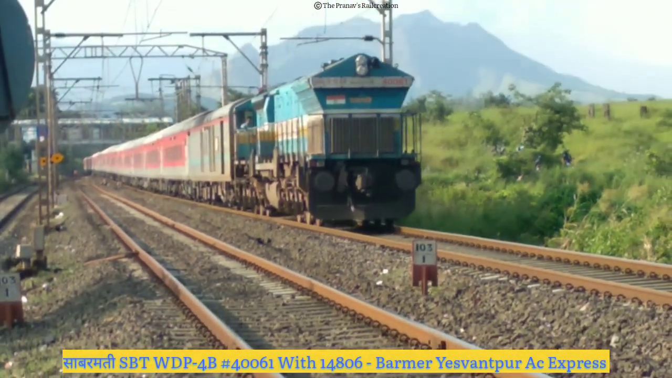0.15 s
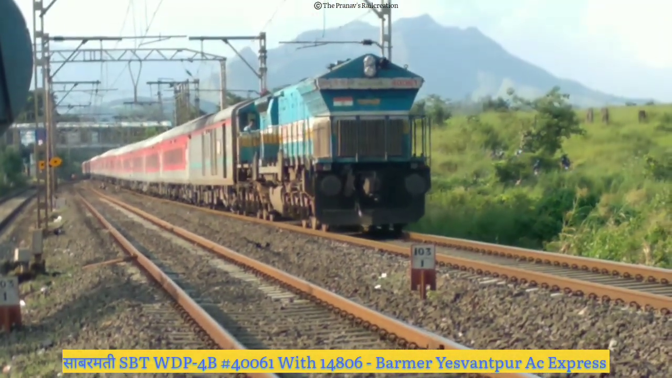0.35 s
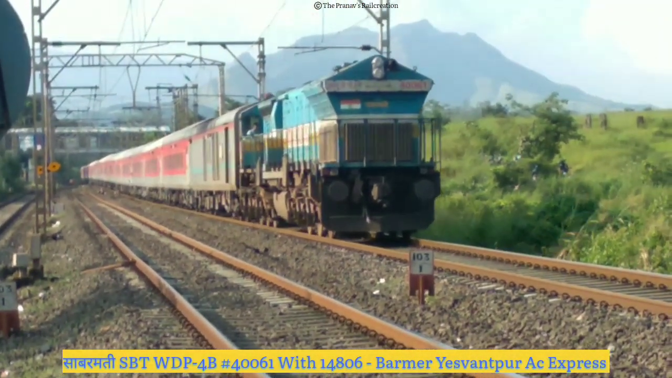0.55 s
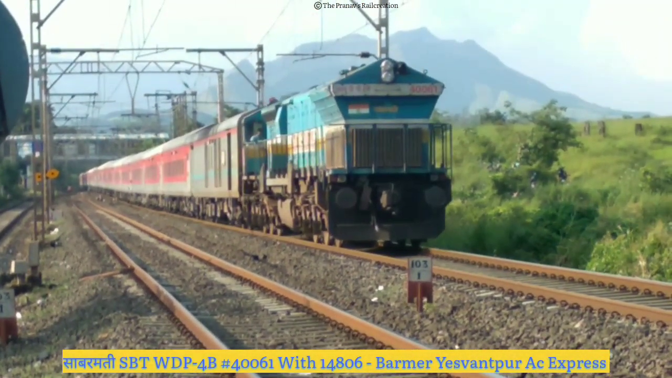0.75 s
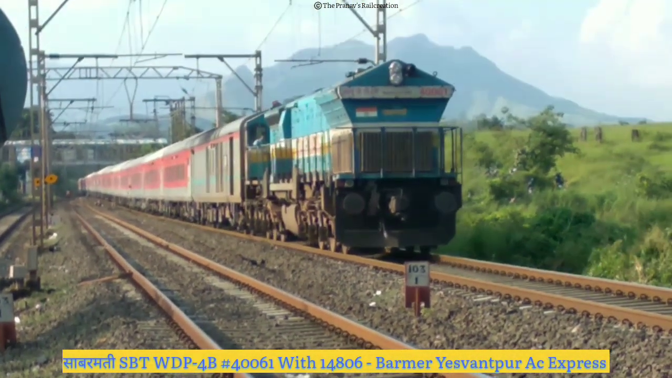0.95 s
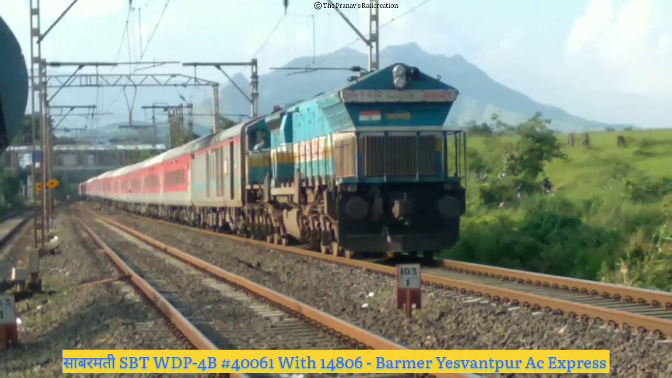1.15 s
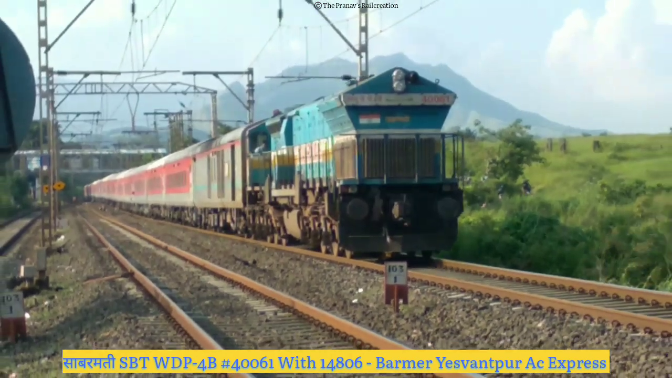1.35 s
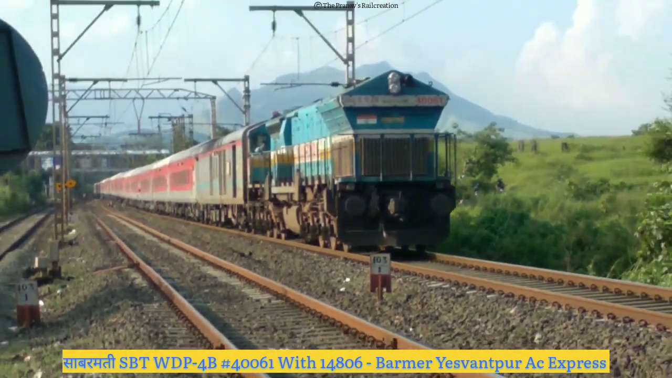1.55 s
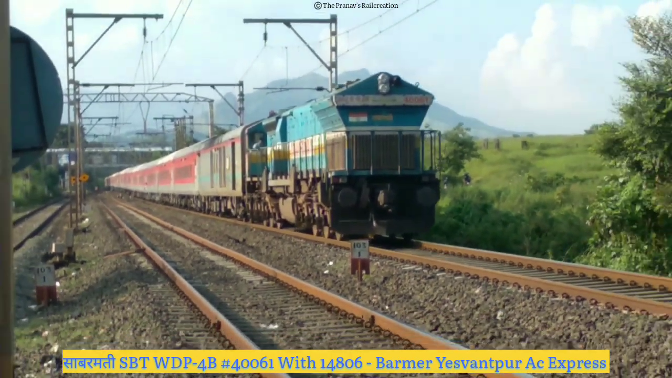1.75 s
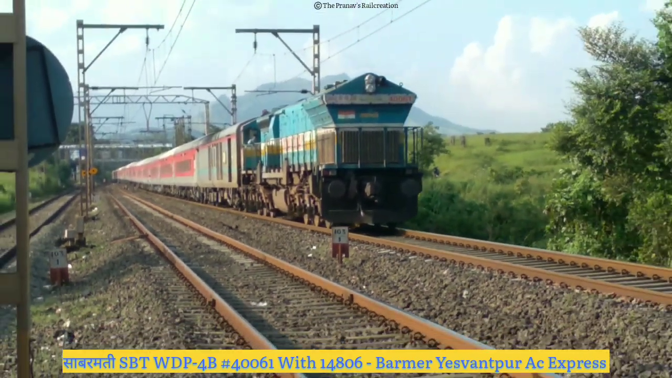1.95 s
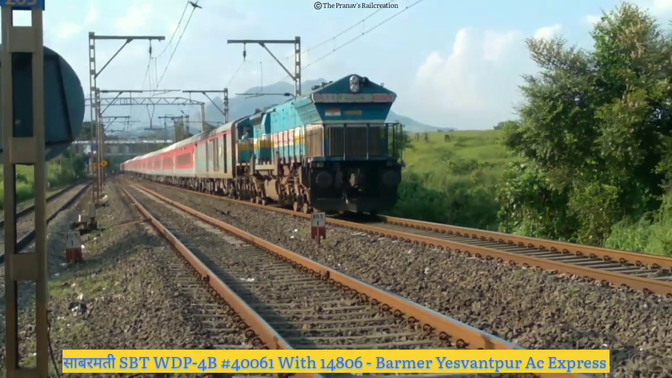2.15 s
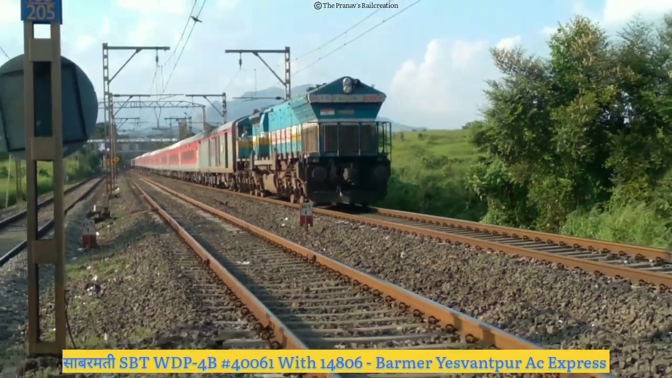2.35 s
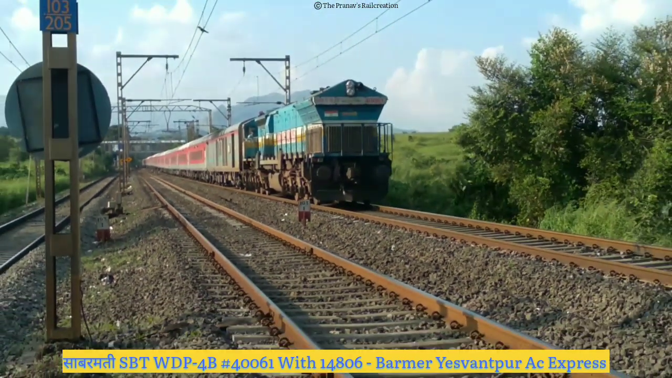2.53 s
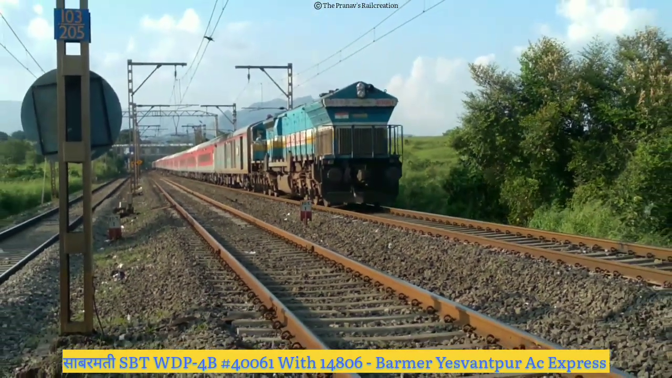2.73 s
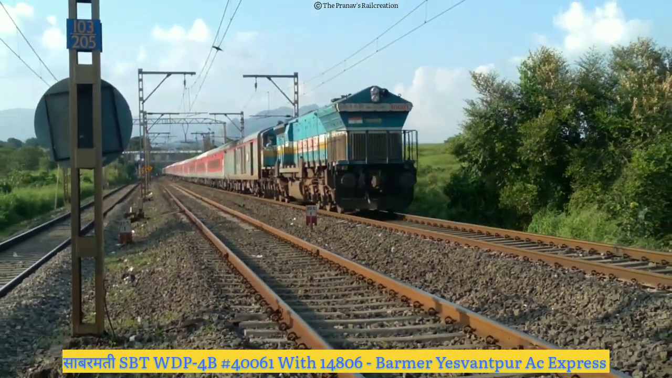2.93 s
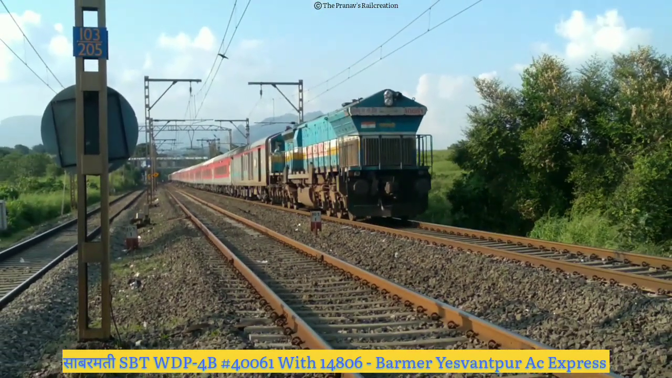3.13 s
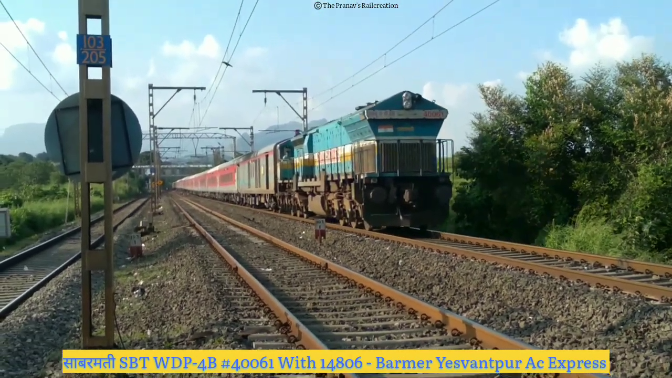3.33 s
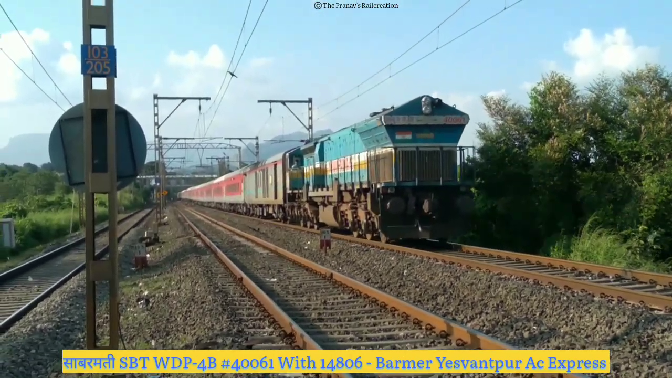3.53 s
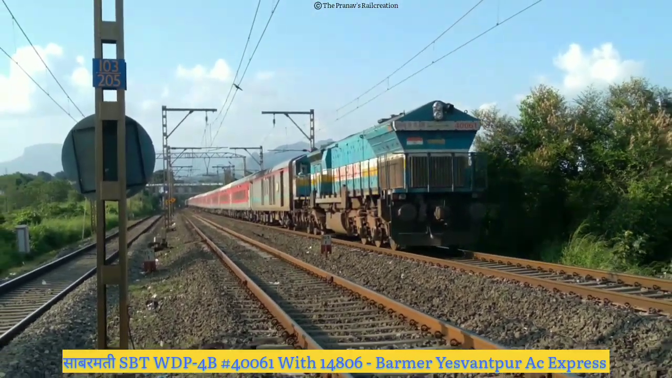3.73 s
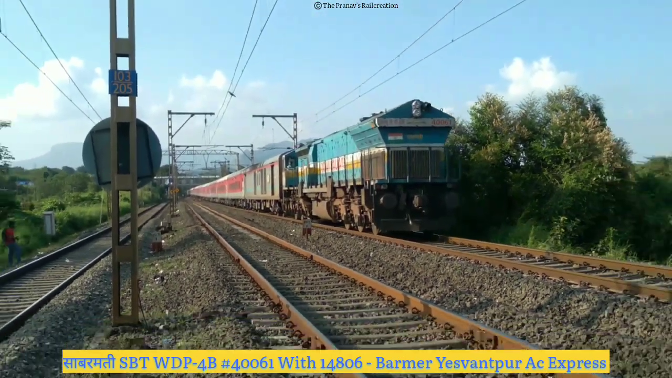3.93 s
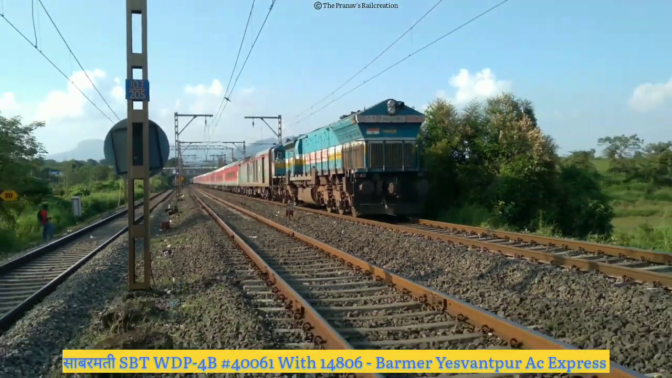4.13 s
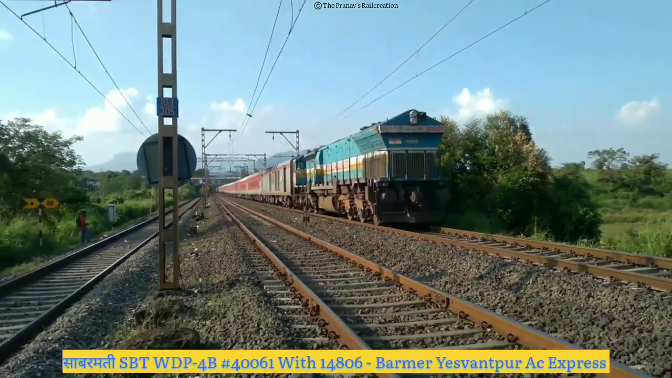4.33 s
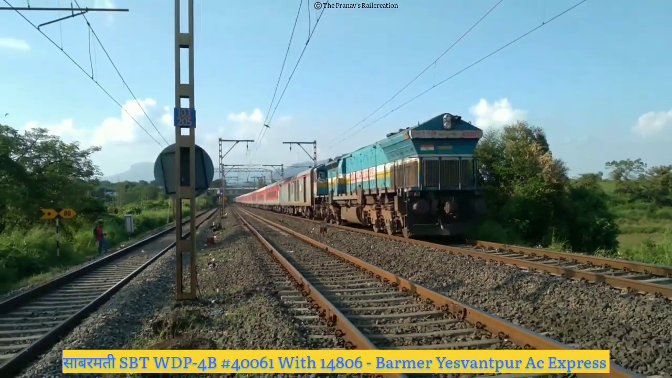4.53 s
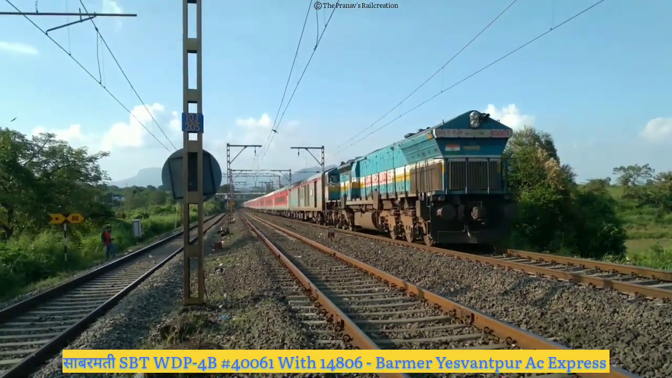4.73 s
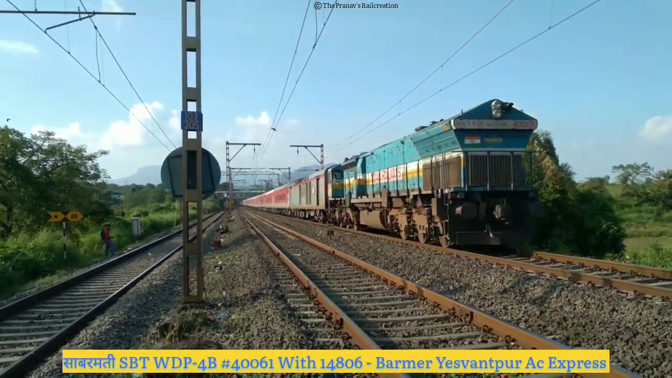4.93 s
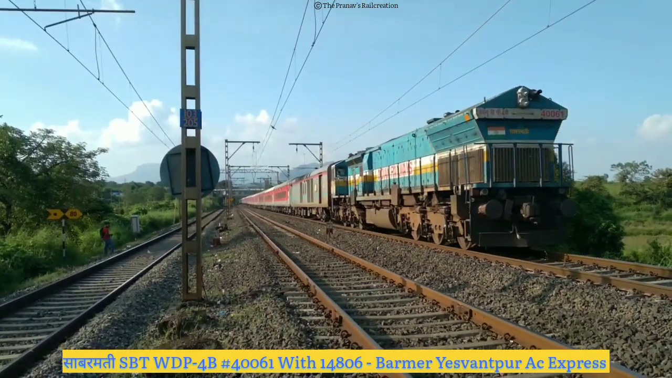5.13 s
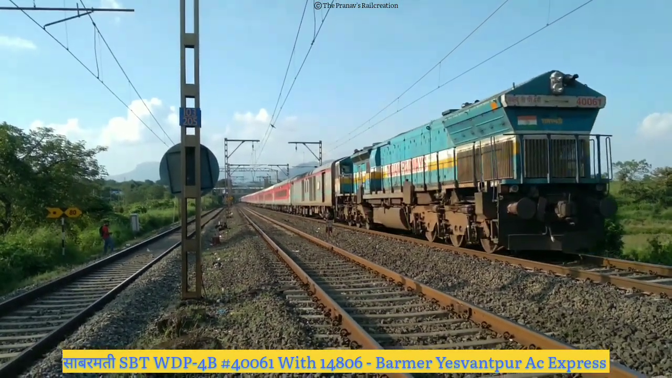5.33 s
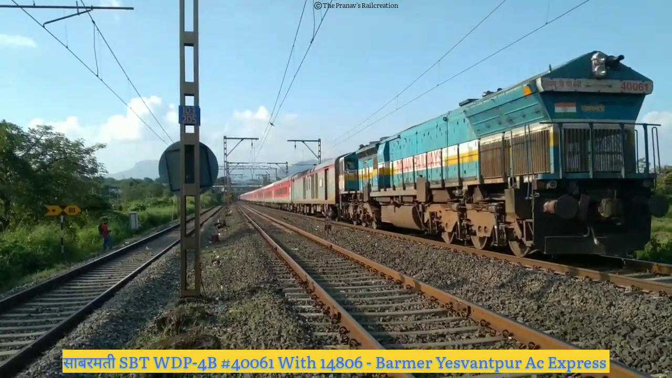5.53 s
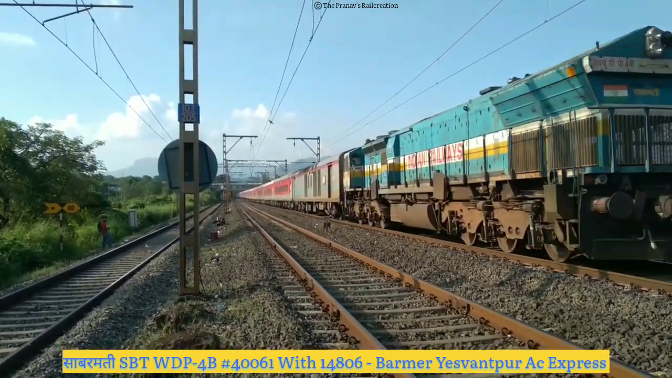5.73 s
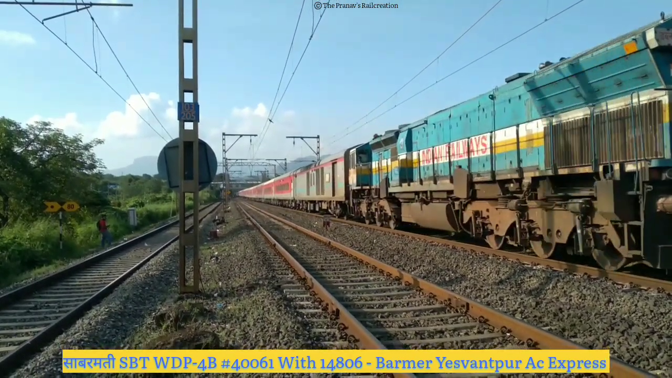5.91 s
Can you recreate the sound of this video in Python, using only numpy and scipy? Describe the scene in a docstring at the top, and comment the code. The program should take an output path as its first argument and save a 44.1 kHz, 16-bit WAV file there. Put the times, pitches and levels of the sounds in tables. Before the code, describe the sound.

Open air beside a railway, heard through a wind-exposed stereo microphone. From 0 to 3 seconds a diesel locomotive is still distant: a soft uneven exhaust throb, a faint low hum, dim airy roar and thin, blurred high whines that swell and fade. A low puff of wind brushes past around 0.3, calms from 1 to 2, then returns. Around 3 the hum dies away and gusts begin to flutter. From 3.5 the engine revs up, its whines rising in small steps, with brief squeals until 4.3 and lower moans from about 4.5. Strong buffets, snaps and thin clicks hit mainly the right between 3.6 and 4.5. A hard left-side gust lands near 5.2, more on the right at 5.55 and 5.75. Roar, hollow rolling drone and right-sided hiss keep growing; engine speed peaks about 5.4 and eases slightly, ending loud and close at 6.

```python
"""Open track: a diesel locomotive approaches and opens up, while wind buffets the two microphone ports.
Exhaust orders and geared whines follow one engine speed, the whines' pitch held in steps by time stretching.
The roar is sliced noise, heard straight and by way of the ground; an early hum, a noisy drone and faint hiss join it.
The wind is low noise on each port, with gusts of flutter and thump and ringing snaps,
and thin clicks of input overload beside it."""
import sys
import numpy as np
from scipy import signal
from scipy.fft import rfft, irfft, next_fast_len
from scipy.io import wavfile
from scipy.ndimage import uniform_filter1d

SR = 44100
rng = np.random.default_rng(int(sys.argv[2]) if len(sys.argv) > 2 else 0)


def level_to_linear(level):
    """Convert decibel levels to linear amplitude factors, elementwise."""
    exponent = np.asarray(level, float) / 20
    return 10 ** exponent


def inscribe(sig):
    """Save sig as 16-bit PCM at rate SR to the path in sys.argv[1].

    A 1-D sig is mono; a 2-D sig holds one channel per row.
    Samples are clipped to [-1, 1] before scaling.
    """
    pcm = np.round(np.clip(np.atleast_2d(sig).T, -1, 1) * 32767)
    wavfile.write(sys.argv[1], SR, pcm.astype(np.int16))


N = 267687   # samples in the scene
LEFT_RIGHT = np.array([[1], [-1]])   # opposite signs on the two ports


def rms_one(x):
    """Scale to unit power."""
    return x / np.sqrt(np.mean(x ** 2) + 1e-20)


def in_time(rows):
    """Columns of a curve table, one value a sample."""
    seconds, *columns = np.transpose(rows)
    return [np.interp(np.arange(N) / SR, seconds, column) for column in columns]


def at_hz(points, hz):
    """Read a spectrum table on a log-frequency axis."""
    table_hz, values = np.array(points).T
    return np.interp(np.log(hz), np.log(np.maximum(table_hz, 1)), values)


def drift(rate_hz):
    """Random wander of unit spread, from noise through two equal poles at a twentieth of the sample rate."""
    pole = np.exp(-40 * np.pi * rate_hz / SR)
    noise = rng.standard_normal(N // 20 + 4002)
    slow = signal.lfilter([1], [1, -2 * pole, pole * pole], noise)[4000:]   # drop the filter's start
    return np.interp(np.arange(N) / 20, np.arange(len(slow)), rms_one(slow))


def cut(x, hz, kind, order=2):
    """Butterworth filter."""
    return signal.sosfilt(signal.butter(order, hz, kind, fs=SR, output="sos"), x)


# Engine speed. Each row: time in seconds, speed in engine cycles per second.
ENGINE_SPEED = [(0.0, 5.305), (0.75, 5.035), (1.25, 5.062), (1.9, 5.104), (2.4, 5.09), (3.1, 5.008),
                (3.4, 5.04), (3.7, 5.215), (3.9, 5.385), (4.325, 5.926), (4.95, 6.638), (5.2, 6.835),
                (5.4, 6.93), (5.6, 6.922), (5.8, 6.838), (6.07, 6.703)]


def engine_speed():
    """The speed that both the exhaust and the whines follow."""
    return in_time(ENGINE_SPEED)[0]


# Exhaust strength. Each row: time in seconds, level in dB, pipe orders against that level in dB.
EXHAUST_LEVEL = [(0.0, -35.5, -8), (0.4, -30, -4), (0.75, -31.5, 2.5), (1.5, -27.5, -0.5),
                 (2.25, -28.5, 0.5), (2.75, -26.5, -10.5), (3.2, -27, -4.5), (3.45, -32, 4),
                 (3.6, -21.5, -1), (4.05, -17, -1.5), (4.45, -19, 5), (4.8, -12, -4.5), (5.2, -14, -3),
                 (5.4, -18, 2), (5.7, -15.5, -5.5), (5.9, -19.5, 1.5), (6.07, -14.5, -2.5)]
# Resonance of the exhaust pipe. Each row: frequency in Hz, gain in dB.
PIPE_RESONANCE = [(60, -27), (77, -11.5), (86, -4.5), (102, -7), (113, -15), (120, -30.5), (150, -41)]
# Exhaust lines heard as they are. Each entry: multiple of the engine cycle.
OPEN_ORDERS = [7, 8, 9, 10, 11, 12]
# Their strengths. Each entry: level in dB against the exhaust.
OPEN_DB = [-23, -0.1, -20, -28, -20, -21.5]
# Odd exhaust lines coloured by the pipe. Each entry: multiple of the engine cycle.
PIPE_ORDERS = [13, 15, 17, 19, 21]
# Their strengths ahead of the pipe. Each entry: level in dB against the exhaust.
PIPE_DB = [-0.2, 0.5, 1.1, -11, -7.5]


def exhaust(turns, speed):
    """Uneven firing leaves lines on multiples of the engine cycle; the pipe favours those passing its resonance."""
    level_db, pipe_db = in_time(EXHAUST_LEVEL)
    orders = list(zip(OPEN_ORDERS, OPEN_DB))
    for order, db in zip(PIPE_ORDERS, PIPE_DB):
        orders.append((order, db + pipe_db + at_hz(PIPE_RESONANCE, order * speed)))
    out = 0
    for order, db in orders:
        lag = np.pi / 2 * (order % 2 == 0)   # even orders run a quarter wave behind
        tone = np.cos(2 * np.pi * order * turns - lag)
        out = out + np.sqrt(2) * level_to_linear(level_db + db + 1.0 * drift(9.2)) * tone
    return out


# Steady hum that fades out after about three seconds. Each row: time in seconds, pitch in Hz, level in dB.
HUM = [(0, 154.5, -42.), (.15, 152.5, -43.), (.5, 151.2, -43.), (2.85, 151.2, -42.), (3.1, 151.2, -46.),
       (3.6, 151.2, -60.), (6.07, 151.2, -80.)]


def hum():
    """A plain sine tone whose level wavers slightly."""
    hz, level_db = in_time(HUM)
    return np.sqrt(2) * level_to_linear(level_db + 0.44 * drift(3.4)) * np.sin(2 * np.pi * np.cumsum(hz) / SR)


# Roar as the locomotive draws near. Each row: time in seconds, level in dB ahead of make-up gain.
APPROACH = [(0.0, -48.5), (0.84, -47.5), (1.39, -45), (2.45, -46.5), (3.5, -42.5), (4.53, -39), (4.95, -36),
            (5.58, -33.5), (6.07, -32.5)]
FAR_DB, NEAR_DB = -46.5, -35   # roar levels between which the colour turns from far to near


def closeness_db():
    """How far the roar has risen over its distant level."""
    return in_time(APPROACH)[0] - FAR_DB


# Colour of the distant roar. Each row: frequency in Hz, relative density in dB per Hz.
FAR_COLOUR = [(100, -41), (170, -9), (247, -6.5), (276, -5), (372, -5.5), (456, -16), (706, -10),
              (1040, -16.5), (1220, -8), (1700, -23), (2430, -13.5), (2710, -28.5), (4410, -29),
              (7160, -45), (9310, -49.5), (15800, -120)]
# Colour of the nearby roar. Each row: frequency in Hz, relative density in dB per Hz.
NEAR_COLOUR = [(100, -31.5), (170, 2), (299, -12), (402, -9), (729, -13.5), (813, -13.5), (1080, -16.5),
               (2210, -21), (2760, -28), (3270, -25), (4770, -33.5), (6030, -35), (7160, -35), (9310, -76),
               (15800, -120)]
# How alike the ports hear the roar. Each row: frequency in Hz, left-right correlation from 0 to 1.
LIKENESS = [(60, 0.93), (120, 1), (230, 1), (450, 0.76), (890, 0.5), (1740, 0.76), (3420, 0.3),
            (6710, 0.095)]
# Stereo balance of the roar. Each row: frequency in Hz, left over right in dB.
BALANCE = [(60, 0), (290, .5), (820, 0.5), (1390, -.5), (2350, 0.5), (3970, -4.5), (6710, 12.5), (8300, -3),
           (11000, -7), (15000, -7)]
ECHO_FAR, ECHO_NEAR, ECHO_LAG_MS = 0.2, 0.31, 1.357   # share (far, near) and lag of the ground echo


def roar(patchy_db):
    """Fans, rails and casing: overlapping slices of noise whose colour changes as the source nears."""
    near = np.clip(closeness_db() / (NEAR_DB - FAR_DB), 0, 1)
    size = next_fast_len(N)
    octave = np.log2(np.fft.rfftfreq(size, 1 / SR) + 1e-9)
    slice_octaves = np.log2(15000 / 150) / 21
    mid, side = rfft(rng.standard_normal((2, size)))
    direct, together = 0, drift(2.4)
    for hz in np.geomspace(150, 15000, 22):
        band = np.maximum(1 - np.abs(octave - np.log2(hz)) / slice_octaves, 0)
        alike = np.clip(at_hz(LIKENESS, hz), 0, 1)
        pair = np.sqrt(1 + alike) * mid + np.sqrt(1 - alike) * side * LEFT_RIGHT
        near_db = at_hz(NEAR_COLOUR, hz) - at_hz(NEAR_COLOUR, 1690)
        far_db = at_hz(FAR_COLOUR, hz) - at_hz(FAR_COLOUR, 1501)
        colour_db = near * near_db + (1 - near) * far_db
        gain = level_to_linear(colour_db + patchy_db * (0.6 * together + drift(12.0)))
        balance = level_to_linear(at_hz(BALANCE, hz) / 2 * LEFT_RIGHT)
        direct = direct + irfft(pair * band, size)[:, :N] * gain * balance
    # the ballast returns a duller copy a moment later, which combs the spectrum
    late = np.arange(N) - ECHO_LAG_MS * SR / 1000
    dull = cut(direct, 1500, "low", order=1)
    bounce = np.array([np.interp(late, np.arange(N), ear) for ear in dull])
    echo_share = ECHO_FAR + (ECHO_NEAR - ECHO_FAR) * near
    return level_to_linear(in_time(APPROACH)[0] + 8.5) * (direct + echo_share * bounce)


# Pitch stairs of the whines, as from time stretching. Each entry: start of a held stretch in seconds.
STRETCH_STARTS = [3.3, 3.45, 3.57, 3.68, 3.87, 4.06, 4.2, 4.33, 4.45, 4.58, 4.77, 4.92, 5.1, 5.25, 5.4]


def stretched_speed(speed):
    """Hold the mean speed through each stretch, as time stretching does to pitch, with the corners smoothed."""
    held, at = speed.copy(), (np.array(STRETCH_STARTS) * SR).astype(int)
    for start, end in zip(at, at[1:]):
        held[start:end] = speed[start:end].mean()
    return uniform_filter1d(held, size=400)


# Strength of each whine by name: base level in dB when far, dB gained per dB of approach.
WHINE_DB = {"gear": (-60.5, 1.325), "clear": (-65.5, 1.2849), "blower": (-65.5, 1.26),
            "squeal": (-79.5, 0.75), "high moan": (-63, 1.91), "low moan": (-68.5, 1.47)}
# Swells and fades of each whine by name. Each row: centre in seconds, peak gain in dB,
# time from centre to 1/e of that gain in ms.
SWELLS = {"gear": [(1.5, 6, 200), (1.9, 4, 190), (3.15, 7, 140), (4.65, 5, 80), (4.9, 3.5, 61),
          (5.12, 6, 40), (5.25, 4, 68), (5.4, 5.5, 92), (5.63, 10.5, 75), (5.8, -18, 93), (5.98, 7.5, 34)],
          "clear": [(0.15, 6, 150), (0.87, 7, 60), (1.05, 8, 60), (1.24, 9, 60), (1.47, 8, 110),
          (1.7, 6, 70), (2.1, -6, 200), (2.75, 6, 130), (3.2, 3, 150), (3.8, 7, 50), (3.95, 6.5, 100),
          (4.5, 4, 60), (4.8, 7, 56), (5.0, 10, 99), (5.27, 5.5, 90), (5.47, 5.5, 57), (5.62, 3, 70),
          (5.85, 8.5, 260)], "blower": [(0.15, 9, 200), (3.76, 8, 80), (3.95, 2, 60), (4.5, -3.5, 320),
          (5.25, 7.5, 120), (5.55, 2, 110), (5.87, 7.5, 150)], "squeal": [(3.7, 25, 40), (3.88, 16, 50),
          (4.06, 18, 43), (4.27, 10, 50)], "high moan": [(4.55, 17, 130), (5.0, 13.5, 99), (5.3, 11, 61)],
          "low moan": [(4.85, 17.5, 210), (5.6, 14, 220)]}


def whine_level(name):
    """A whine grows with the approach, wavers, and swells or fades now and then."""
    far_db, slope = WHINE_DB[name]
    t = np.arange(N) / SR
    swell_db = sum(db * np.exp(-((t - s) / (ms / 1000)) ** 2) for s, db, ms in SWELLS[name])
    return far_db + slope * closeness_db() + 0.97 * drift(2.8) + swell_db


def whine(turns, lines, level_db):
    """Engine-locked tones blurred by turbulent air; more blur leaves less steady core and less likeness of ports."""
    out = 0
    for multiple, blur_hz, line_db in lines:
        angle = 2 * np.pi * multiple * turns
        core = 3.4 * np.exp(-blur_hz / 40)
        shared = (core + drift(blur_hz)) * np.cos(angle) + drift(blur_hz) * np.sin(angle)
        own = np.array([drift(blur_hz) * np.cos(angle), drift(blur_hz) * np.sin(angle)])
        out = out + level_to_linear(line_db) * (shared + (0.3 + blur_hz / 60) * own)
    return level_to_linear(level_db) * rms_one(out)


# Lines of each whine by name. Each row: multiple of the engine cycle, blur rate in Hz,
# gain in dB against the whine's other lines.
WHINES = {"gear": [(474.5, 26., 0.), (463., 20., -8.), (485.5, 20., -7.)], "clear": [(566.7, 8., 0.)],
          "blower": [(881., 38., 0.), (862., 120., -2.)], "squeal": [(962., 30., 0.)],
          "high moan": [(110., 5., 0.)], "low moan": [(79., 5., 0.)]}


def whines(speed):
    """All whines geared to the engine, whose pitch is held in steps by time stretching."""
    turns = np.cumsum(stretched_speed(speed)) / SR
    return sum(whine(turns, lines, whine_level(name)) for name, lines in WHINES.items())


# Hollow drone of rolling noise in one resonance. Each row: time in seconds, level in dB ahead of a small trim.
DRONE = [(0.0, -49.5), (1.05, -42), (3.36, -39), (3.63, -36), (4.9, -33.5), (5.1, -30), (5.6, -29),
         (5.83, -35.5), (6.07, -26)]
DRONE_HZ, DRONE_BLUR_HZ = 719.5, 77


def drone():
    """Narrow noise around one centre, mostly common to both ports."""
    angle = 2 * np.pi * DRONE_HZ * np.arange(N) / SR
    mid, side = [drift(DRONE_BLUR_HZ) * np.cos(angle) + drift(DRONE_BLUR_HZ) * np.sin(angle) for _ in "ms"]
    return level_to_linear(in_time(DRONE)[0] - 0.5) * (mid + 0.22 * side * LEFT_RIGHT)


# Lag of the left port. Each row: time in seconds, lag in microseconds (negative leads).
LEFT_LAG = [(0, 23), (3, 20), (4.2, 0), (5.2, -45), (6.07, -80)]


def move_across(wide):
    """As the source moves across, the left port turns from hearing it last to hearing it first."""
    heard_at = np.arange(N) - in_time(LEFT_LAG)[0] * SR / 1e6
    wide[0] = np.interp(heard_at, np.arange(N), wide[0])
    return wide


# Thin high hiss, as one pair: level in dB when far ahead of trim, dB gained per dB of approach.
HISS_LEVEL = (-65.5, 1.0)
HISS_HZ, HISS_WIDTH_HZ, HISS_LEFT_DB = 9650, 1100, -21.5   # centre, width, left port against right


def hiss():
    """A narrow band of flickering noise, almost all on the right."""
    edges = [HISS_HZ - HISS_WIDTH_HZ / 2, HISS_HZ + HISS_WIDTH_HZ / 2]
    band = rms_one(cut(rng.standard_normal((2, N)), edges, "band"))
    level_db = HISS_LEVEL[0] + HISS_LEVEL[1] * closeness_db() + 1.0 * drift(15.0) - 4.0
    return band * level_to_linear(level_db) * level_to_linear(np.array([[HISS_LEFT_DB], [0]]))


# Faint rush at the very top, as one pair: level in dB when far ahead of make-up gain, dB gained per dB of approach.
AIR_LEVEL = (-91.5, 1.7)


def air():
    """Smooth high noise, unrelated in the two ports and a little weaker on the left."""
    high = cut(rng.standard_normal((2, N)), 8600, "high", order=4)
    top = rms_one(cut(high, 10500, "low", order=3))
    level_db = AIR_LEVEL[0] + AIR_LEVEL[1] * closeness_db() + 9.5 + 1.5 * drift(6.0)
    return top * level_to_linear(level_db) * level_to_linear(np.array([[-3.0], [0]]))


# Wind on the ports. Each row: time in seconds, level in dB, right over left in dB.
WIND = [(0.0, -39.5, 4), (0.3, -25.5, 1), (0.6, -32.5, 6.5), (1.0, -50.5, 1), (1.5, -52, 0), (2.2, -42, 3),
        (2.5, -32.5, -3), (2.75, -31.5, -0.5), (3.05, -22.5, -7.5), (3.25, -24.5, 6), (3.55, -15.5, 4),
        (3.75, -16.5, 16), (4.0, -10, 7.5), (4.22, -24, -7.5), (4.5, -12, 12), (4.8, -21, 2.5),
        (5.1, -18, 4), (5.45, -10, 9.5), (5.7, -16, 1.5), (6.07, -12.5, 6.5)]


def wind_db():
    """Wind strength at the left and right port."""
    level_db, lean_db = in_time(WIND)
    return level_db - lean_db / 2 * LEFT_RIGHT


def rumble():
    """Lumpy low noise, partly common to both ports, with a tail that grows faster than the wind."""
    white = rng.standard_normal((2, N)) + 0.72 * rng.standard_normal(N)
    level_db = wind_db() + 2.7 * np.array([drift(3.1), drift(3.7)])
    low = rms_one(cut(cut(white, 24, "high"), 117.7, "low", order=3))
    tail = rms_one(cut(cut(white, 117, "high"), 197.5, "low", order=3))
    lumps = 1.3 * np.tanh(np.array([drift(14.0), drift(10.0)]) / 1.3)
    return level_to_linear(level_db) * low + level_to_linear(1.464 * level_db - 9.5 + 6.8 * lumps) * tail


# Strongest gusts, flapping on one port. Each row: centre in seconds, port (0 left, 1 right),
# level in dB ahead of each layer's gain, nominal length in ms.
GUSTS = [(3.013, 0, -20.5, 14), (3.102, 1, -17, 13), (3.115, 0, -25, 12), (3.188, 1, -21.5, 6),
         (3.301, 1, -17.5, 18), (3.402, 1, -20, 24), (3.442, 0, -20, 9.8), (3.528, 1, -12, 17),
         (3.611, 1, -15, 56), (3.693, 1, -8.5, 17), (3.73, 1, -11.5, 13), (3.87, 1, -14.5, 11.5),
         (3.982, 1, -17, 21), (4.014, 0, -10.5, 11.5), (4.138, 1, -10, 14), (4.179, 1, -14.5, 8.9),
         (4.331, 1, -17.5, 22), (4.446, 1, -18.5, 20), (4.517, 1, -7.5, 8.5), (4.859, 1, -19, 20),
         (5.127, 1, -16.5, 11), (5.163, 0, -10.5, 16), (5.171, 1, -10, 9.4), (5.239, 0, -3.5, 27.5),
         (5.28, 1, -13, 16), (5.309, 0, -10, 6.1), (5.341, 1, -10, 9.9), (5.446, 1, -14.5, 42),
         (5.552, 1, -6, 5.2), (5.633, 0, -12.5, 8.6), (5.742, 1, -7, 10.7), (5.748, 0, -14.5, 42),
         (5.786, 1, -19, 11), (5.874, 1, -27.5, 9.7), (5.991, 1, -18, 15)]
EDGE_DB, THUMP_DB, THUMP_LONGER = -20.5, -6.5, 2.65   # edge and thump offsets; thump length against the body


def gusts():
    """Each gust opens a short window on mid-low flutter and uneven sharp edges, and a longer one on a low thump."""
    body, edge, slow = np.zeros((3, 2, N))
    t = np.arange(N) / SR
    for s, port, level_db, ms in GUSTS:
        port = int(port > 0.5)
        around = slice(int((s - 0.2) * SR), int((s + 0.2) * SR))
        shape = np.exp(-((t[around] - s) / (max(ms, 6) / 1400)) ** 2)
        body[port, around] += level_to_linear(level_db) * shape
        edge[port, around] += level_to_linear(1.38 * level_db + EDGE_DB) * shape ** 2
        slow[port, around] += level_to_linear(level_db + THUMP_DB) * shape ** (1 / THUMP_LONGER ** 2)
    white = rng.standard_normal((2, N))
    flutter = rms_one(cut(cut(cut(white, 140, "high"), 202, "low"), 900, "low"))
    thump = rms_one(cut(cut(white, 37, "high"), 107, "low", order=3))
    uneven = white * level_to_linear(5 * np.array([drift(120.0), drift(120.0)]))
    sharp = rms_one(cut(cut(uneven, 290, "high"), 1200, "low", order=4))
    return body * flutter * level_to_linear(3.0) + edge * sharp * level_to_linear(1.0) + slow * thump


# Strongest snaps of air on one port. Each row: time in seconds, port (0 left, 1 right), level in dB ahead of kick gain.
SNAPS = [(3.579, 1, -22), (3.595, 1, -16), (3.605, 1, -13), (3.678, 1, -19), (3.694, 1, -9),
         (3.72, 1, -11.5), (3.731, 1, -15), (3.784, 1, -16.5), (3.894, 1, -15), (3.979, 1, -19),
         (4.101, 1, -15.5), (4.182, 1, -20.5), (4.521, 1, -17), (4.533, 1, -20.5), (5.159, 0, -8),
         (5.222, 0, -14), (5.237, 0, -18), (5.25, 0, -19), (5.744, 1, -9.5), (5.753, 1, -9), (5.792, 1, -9)]
SMALL_SNAPS_PER_S, SMALL_SNAP_DB = 8.0, -16.5   # random lesser snaps on each port; level against the wind
SNAP_SPREAD_MS = 7.0    # a snap stutters over this time
KICK_GAIN_DB = 35.0     # makes up for the filters dulling a one-sample kick


def snaps():
    """Pressure kicks ring briefly through filters and stutter on more weakly; lesser ones come at random."""
    small = (rng.random((2, N)) < SMALL_SNAPS_PER_S / SR) * rng.standard_normal((2, N))
    kicks = small * level_to_linear(wind_db() + SMALL_SNAP_DB + KICK_GAIN_DB) + 1e-18
    strengths = np.array([1, 0.74, 0.75, 0.69, 0.47])
    for s, port, level_db in SNAPS:
        when, sign = rng.random((2, 5))
        delay = when * [0, 1, 1, 1, 1] * SNAP_SPREAD_MS * SR / 1000   # the first kick has no delay
        at = int(s * SR) - 40 + delay.astype(int)
        kicks[int(port > 0.5), at] = level_to_linear(level_db + KICK_GAIN_DB) * np.sign(sign - 0.5) * strengths
    return cut(cut(cut(kicks, 330, "high"), 690, "low"), 1900, "low")


# Thin bright overload clicks on the right port. Each row: time in seconds, impulse level in dB ahead of filters and gains.
OVERLOAD_CLICKS = [(3.605, -17), (3.692, -10), (3.7835, 3), (3.979, -20), (4.519, -6)]


def overload_clicks():
    """Input overload as single-sample impulses, split into a dull part and a bright part."""
    click = np.zeros((2, N))
    for s, level_db in OVERLOAD_CLICKS:
        click[1, int(s * SR)] = level_to_linear(level_db)
    return level_to_linear(6.5) * cut(click, 1900, "low") + level_to_linear(-24.0) * cut(click, 5000, "high")


def scene():
    """Exhaust and hum in the middle, roar and whines spread, wind on each port, clicks on the right."""
    speed = engine_speed()
    turns = np.cumsum(speed) / SR - 0.151   # crank position in engine cycles
    wide = move_across(roar(patchy_db=1.08) + whines(speed) + drone())
    wind = rumble() + gusts() + snaps()
    return exhaust(turns, speed) + hum() + wide + hiss() + air() + wind + overload_clicks()


def top_cut(x):
    """Nothing passes above the cut-off."""
    return signal.sosfilt(signal.butter(12, 15720, fs=SR, output="sos"), x)


def record(dry):
    """The strongest buffets are rounded off at the input."""
    top = 0.97   # of full scale
    rounded = top * np.tanh(dry / top)
    return top_cut(rounded)


dry = scene()
out = record(dry)
inscribe(out)
```